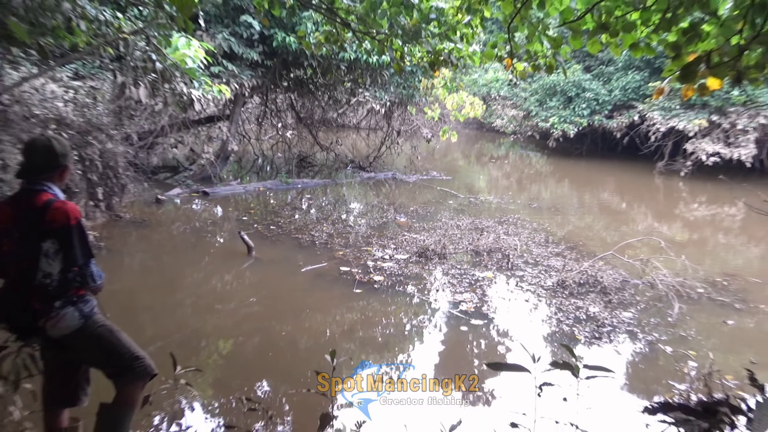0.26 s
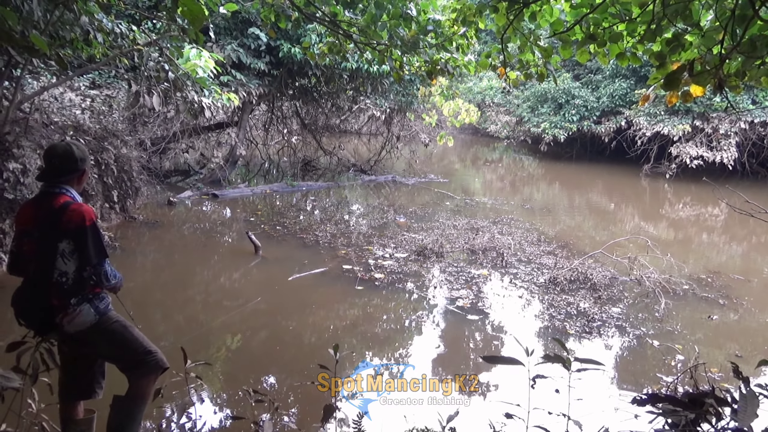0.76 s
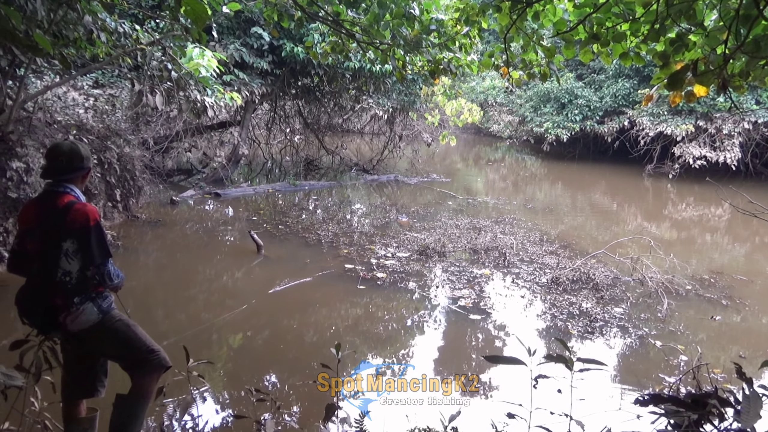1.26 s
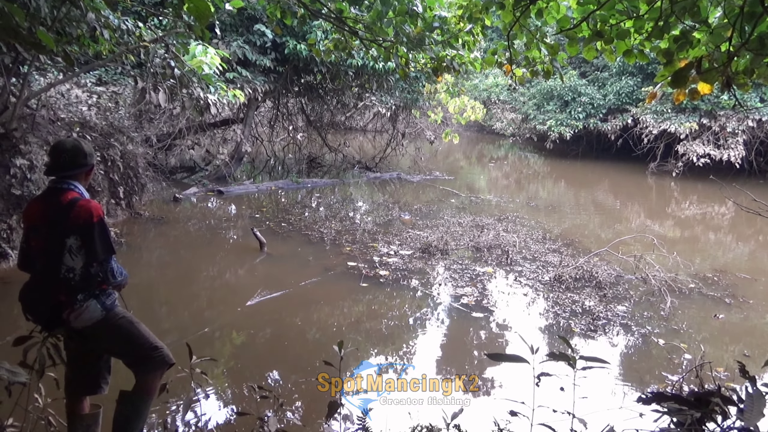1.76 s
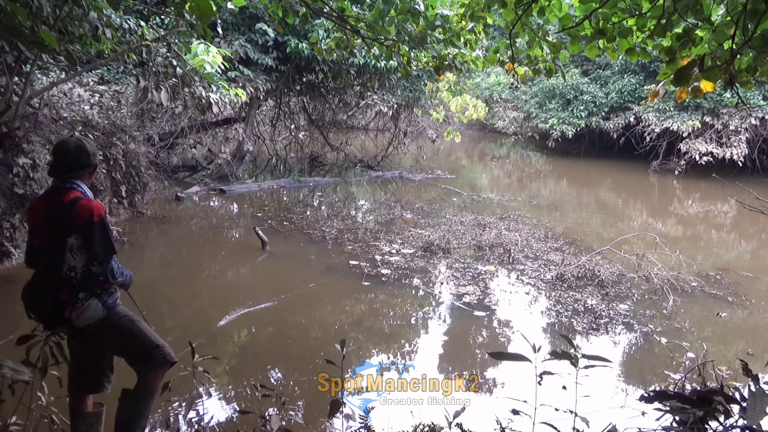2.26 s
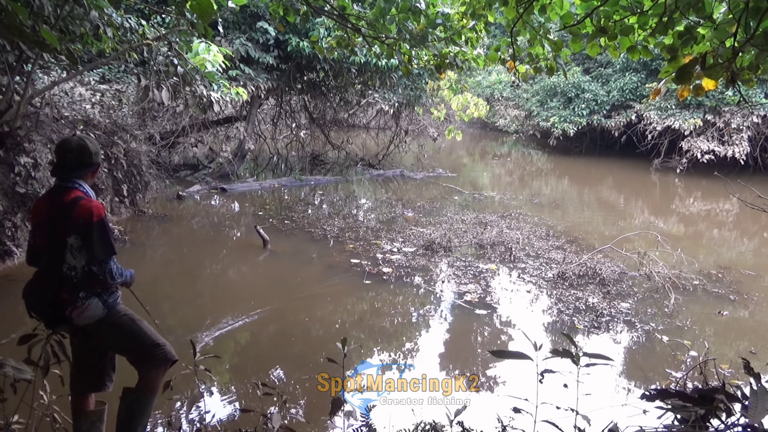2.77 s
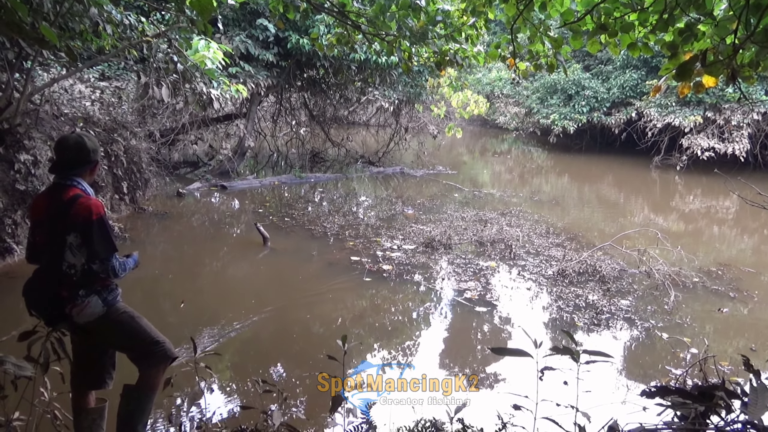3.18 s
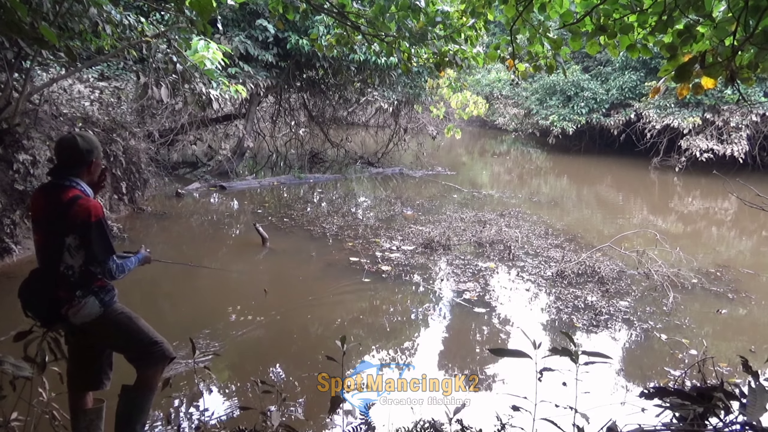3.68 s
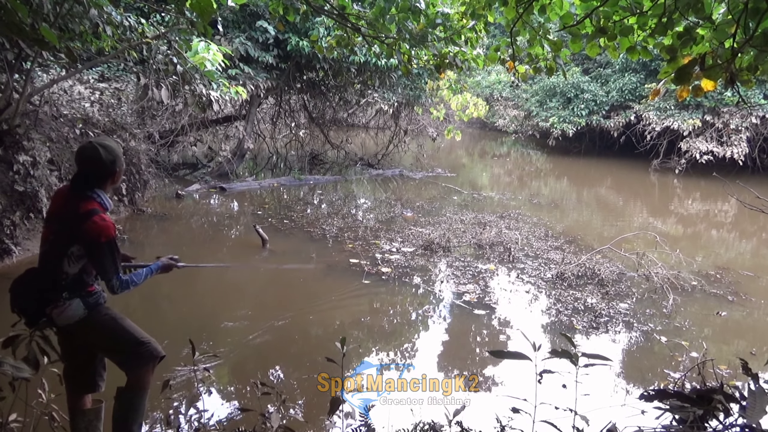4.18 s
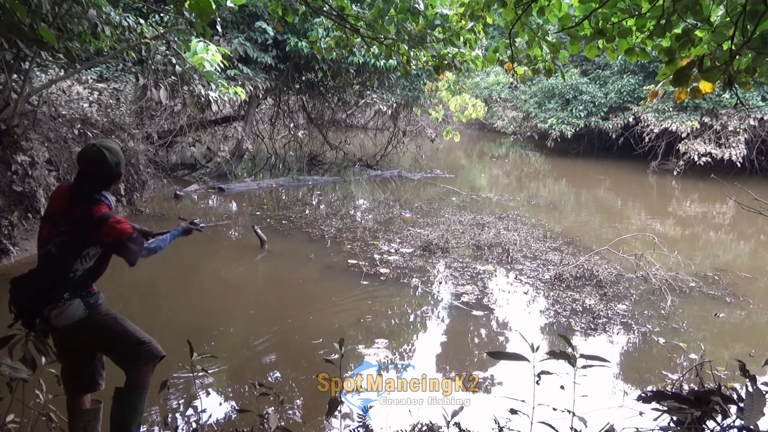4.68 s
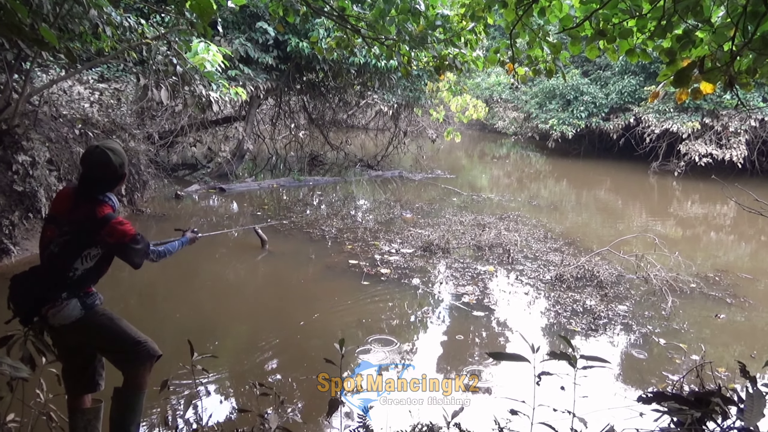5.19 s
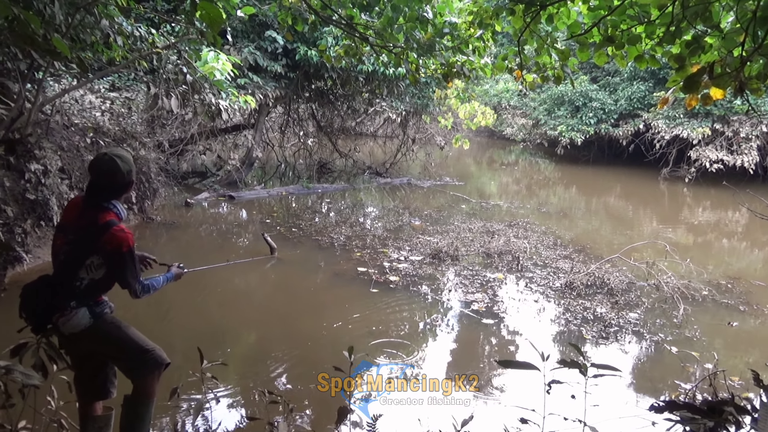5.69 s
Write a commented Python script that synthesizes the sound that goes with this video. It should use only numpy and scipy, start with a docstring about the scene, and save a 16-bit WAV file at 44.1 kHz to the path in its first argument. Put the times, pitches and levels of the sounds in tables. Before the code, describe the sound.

Cicadas sizzle steadily over a quiet muddy river while high insect chirps and trills repeat, water plips, and an angler's reel snaps and rod swishes in a cast.

```python
"""Cicadas sizzle without pause by a muddy forest river; one high singer chirps, another gives longer trills.
Cicadas and river are coloured noise; the singers are pulsed tones, smeared by echoes among the trees. Water
plips as ringing bubbles over a low throb that swells, then holds; a distant bird calls faintly near 1.6 kHz and
something ticks far off. An angler winds in, snaps the reel open and flicks the rod: bands of noise swish, the
line runs out as shaped noise, reel and tackle click and ring."""
import sys
import numpy as np
from scipy import signal
from scipy.fft import rfft, irfft
from scipy.io import wavfile

SR = 44100
rng = np.random.default_rng(int(sys.argv[2]) if len(sys.argv) > 2 else 0)


def master_out(mix):
    """Clip the mix to full scale and print it as 16-bit PCM to the path in sys.argv[1]."""
    frames = np.transpose(np.atleast_2d(mix))
    ceiling = np.clip(frames, -1, 1)
    pcm = np.round(ceiling * 32767).astype(np.int16)
    wavfile.write(sys.argv[1], SR, pcm)


N = 261954  # length of the scene [samples]
T = np.arange(N) / SR  # time [s]
BINS = np.fft.rfftfreq(N, 1 / SR)  # frequencies of the whole scene's spectrum [Hz]
EDGE_HZ = 15600  # nothing much is heard above this

# How fast echoes in the forest die away: (pitch [Hz], time to fall by 60 dB [s])
FOREST_T60 = [(200, 0.36), (2500, 0.31), (8000, 0.29), (14000, 0.067)]

# Colour of the river and forest air: (pitch [Hz], relative level [dB per Hz])
AIR_COLOUR = [(20, -19), (70, -7), (110, -2.5), (150, 2.5), (200, -2), (310, -7.5), (700, -10.5),
              (1300, -14), (2100, -15), (2600, -16), (3300, -18), (5000, -22), (11000, -22), (15500, -29.5)]
AIR_DB = -39.5
# How alike the air is in the left and right ear: (pitch [Hz], correlation [-1 to 1])
AIR_LIKENESS = [(60, 0.98), (170, 0.99), (350, 0.54), (700, 0.035), (1500, 0.07), (3000, 0.13),
                (6000, 0.76), (10000, 1), (11500, 1)]
# Tones of the low throb: (pitch [Hz], level before the swell [dB])
THROB_TONES = [(34.8, -45), (57.3, -58), (145.5, -54)]
# How the throb swells, then holds: (time [s], gain [dB])
THROB_SWELL = [(0, -7), (1.3, -4), (2.3, 0), (5.9, 0)]

# Colour of the cicada chorus: (pitch [Hz], relative level [dB per Hz])
CICADA_COLOUR = [(5400, -34.5), (6250, -21), (6550, -26.5), (7000, -16.5), (7900, -7), (8100, -13.5),
                 (8300, -4.5), (8680, -3.5), (8850, -1.1), (8970, -2), (9170, -7.1), (9450, -18.1),
                 (9850, -21.1), (11000, -52)]
# Loudness of the chorus: (time [s], level before gain_db [dB])
CICADA_LEVEL = [(0, -32), (2.8, -31.4), (4.0, -32), (4.7, -33), (4.85, -31.5), (5.0, -35.5), (5.94, -34)]

# One distant singer that never stops; its level is set before the ears are blended
FAR_DRONE_HZ, FAR_DRONE_DB, FAR_DRONE_SWAY_DB = 6835, -46.5, 1.5
# Calls of other singers deep in the forest:
# (start [s], length [s], pitch [Hz], level before the ears are blended [dB])
FAR_CALLS = [(0.62, 0.39, 6400, -46.5), (2.16, .22, 7300, -42), (2.615, .16, 6370, -43),
             (3.974, 0.12, 7340, -39), (4.89, 0.21, 6370, -45), (4.913, .14, 7200, -42),
             (5.494, 0.1, 6320, -45), (5.82, .16, 7250, -41)]

# Faint calls of a distant bird: (start [s], length [s], pitch [Hz], level before echoes [dB])
BIRD_CALLS = [(0.024, .38, 1580, -55.5), (3.179, 0.14, 1646, -52.5)]

# Resonances of a faint, even ticking far off, perhaps a frog:
# (pitch [Hz], level before softening [dB], time to fall by 60 dB [s])
TICK_MODES = [(2095, -45, .024), (2610, -41.5, 0.019), (2810, -41.5, 0.022)]
TICKS_PER_S = 25

# The clearest plips of water: (time [s], level [dB], starting pitch [Hz], rise [octaves per s])
PLIPS = [(.426, -32.5, 1386, 8), (.483, -30, 3480, 30), (.486, -28, 2480, 32), (0.879, -34, 1600, 98),
         (.929, -34.5, 858, 44), (1.05, -32, 2750, 5), (1.151, -31.5, 895, 3), (1.152, -32, 1454, 1),
         (1.48, -29, 1665, 82), (1.538, -32, 1063, 5), (1.542, -32, 1830, 0), (1.602, -32, 2110, 5),
         (1.643, -24, 1640, 60), (1.714, -30.5, 2420, 22), (1.803, -23, 2340, -5), (2.241, -27, 2160, 80),
         (2.342, -29, 640, 4.5), (2.343, -27.5, 990, 72), (2.626, -25, 1010, 5.5), (2.777, -25, 3530, 1.5)]
BUBBLE_CYCLES = 59  # a bubble falls by 60 dB in this many cycles, so large ones ring longer
# Water sloshing at the bank: (crest [s], rise [s], level [dB])
SLOSHES = [(2.35, 0.026, -45), (2.8, .18, -45.5)]
SLOSH_FALL_DB_PER_S = 90

# Second singer, alike trills a little under a second apart: (start [s])
TRILLS = [-.11, .74, 1.68, 2.54, 3.41, 4.31, 5.27]
TRILL_S, TRILL_PULSES_PER_S = .44, 42
TRILL_HZ, TRILL_DB = 7483, -24.5  # at the top of the arch, before the swing of each pulse
TRILL_SAG_HZ, TRILL_SAG_DB, TRILL_SKEW = 64.4, 6.5, 1.2  # both ends lie lower; the top comes late

# Chirps of the near singer: (strongest pulse [s], swell [s], level before gain_db [dB])
CHIRPS = [(.25, 0.074, -28.5), (.596, .064, -27.5), (.966, .046, -26.5), (1.319, 0.038, -15.5),
          (1.709, .044, -17.5), (2.074, 0.035, -19.2), (2.418, .04, -26.5), (2.807, 0.052, -18),
          (3.204, 0.083, -17), (3.532, 0.051, -24.5), (3.914, 0.079, -18.5), (4.243, 0.071, -28.5),
          (4.587, .077, -19.5), (4.86, 0.057, -27), (5.104, 0.045, -18.5), (5.427, .042, -20),
          (5.773, 0.066, -26.5)]
CHIRP_HZ, CHIRP_PULSES_PER_S = 7680, 40.4

# Swings of the rod, back and then forward:
# (fastest moment [s], speeding up [s], slowing down [s], top pitch [Hz], level [dB])
SWINGS = [(4.47, .18, 0.16, 3570, -50), (4.75, .125, .16, 6740, -38)]
SWING_SLOW_SHARE = .45  # pitch at rest as a share of the top pitch
SWING_LOUDNESS_POWER = 1.7  # loudness grows as this power of speed

# Line hisses as it is wound in
WIND_CREST_S, WIND_RISE_S, WIND_HOLD_S, WIND_FALL_DB_PER_S = 2.1, 0.042, 0.43, 120
WIND_HZ, WIND_DB = 3474, -46.5

# Line rattles off the spool in the cast
SPOOL_CREST_S, SPOOL_RISE_S, SPOOL_HOLD_S, SPOOL_FALL_DB_PER_S = 4.695, .034, .06, 99
SPOOL_DB = -33

# Knocks of reel and tackle:
# (time [s], level [dB], time to fall by 60 dB [s], brightness [dB per octave])
KNOCKS = [(4.1201, -5.5, 0.0056, 3.5), (4.1214, -12.5, 0.021, 1), (4.13, -21, 0.096, 3.5),
          (4.6744, -7.5, 0.0029, 1.5), (4.7184, -12, .005, 11), (5.595, -30, 0.22, 9.5),
          (5.669, -28, 0.019, -2), (5.674, -21, 0.021, -2.5), (5.679, -32, 0.11, 0),
          (5.783, -25, 0.034, -6.5)]
# What the reel rings with: (pitch [Hz], relative level [dB per Hz])
REEL_COLOUR = [(200, -5.5), (700, -13), (1000, -8.5), (1700, -6), (2250, -5), (2620, 9), (3100, -6.5),
               (3900, -3.5), (4600, -6), (5600, -6), (8000, -6), (11000, -9), (13000, -37), (16000, -24)]
REEL_LEFT_DB = 1.1  # the angler stands to the left: left ear up, right ear down by this much
# The wire of the reel rings on after the first snap:
# (pitch [Hz], level [dB], time to fall by 60 dB [s])
WIRE_MODES = [(2640, -21.5, .12)]
BAIL_S = 5.596  # the bail of the reel clunks shut
# Tones of the bail: (pitch [Hz], level [dB], time to fall by 60 dB [s])
BAIL_MODES = [(797, -27.5, 0.035), (1080, -32, .03), (1410, -24.5, 0.033)]

# Line slapping the rod rings: (time [s], level [dB], time to fall by 60 dB [s])
SLAPS = [(4.7396, -6.5, 0.015), (4.7474, -2.5, 0.015), (4.755, -13, 0.013)]
# What the rod rings sound like when slapped: (pitch [Hz], relative level [dB per Hz])
ROD_RING_COLOUR = [(2000, -44), (5000, -17), (7000, -4.5), (8500, -3.5), (9600, 6.5), (11300, -4),
                   (12500, -8), (16000, -24)]
# Small metal tinkles of the tackle: (time [s], gain on the tones below [dB])
TINKLES = [(4.886, -37), (5.046, -39), (5.248, -36)]
# Tones of a tinkle: (pitch [Hz], relative level [dB], time to fall by 60 dB [s])
TINKLE_MODES = [(10750, -1, 0.08), (11950, -2.5, 0.08)]


def amp(db):
    """Turns decibels into a gain."""
    return 10 ** (np.asarray(db) / 20)


def unit(x):
    """Scales a sound to an average strength (rms) of 1."""
    return x / np.sqrt(np.mean(abs(x) ** 2) + 1e-20)


def at_hz(points, hz):
    """Reads a table between its points, on a log-frequency axis."""
    f, value = np.transpose(points)
    return np.interp(np.log(hz + 1), np.log(f + 1), value)


def curves(rows, t):
    """Reads each column of a table at the times t."""
    s, *columns = np.transpose(rows)
    return [np.interp(t, s, column) for column in columns]


def add(mix, s, sound):
    """Mixes a sound in at time s, or at the very start if s is negative."""
    part = mix[max(round(s * SR), 0):][:len(sound)]
    part += sound[:len(part)]


def wander(hz):
    """Random drift of rms 1, with speeds up to about hz."""
    spectrum = rfft(rng.standard_normal(N))
    return unit(irfft(spectrum * np.exp(-(BINS / hz) ** 2), N))


def fuzzy_tone(hz, width_hz):
    """A band of noise around a pitch that may move."""
    phase = 2 * np.pi * np.cumsum(hz * np.ones(N)) / SR
    return unit(wander(width_hz) * np.cos(phase) + wander(width_hz) * np.sin(phase))


def stereo_noise(spectrum, same):
    """Coloured noise with a given likeness between the ears."""
    mid, side = rfft(rng.standard_normal((2, N))) * amp(at_hz(spectrum, BINS))
    same = np.clip(same, -1, 1)
    mid = mid * np.sqrt(1 + same)
    side = side * np.sqrt(1 - same)
    return unit(irfft(np.array([mid + side, mid - side]), N))


def forest(x, wet_db, spread):
    """Direct sound plus scattered echoes from trunks and leaves; each pitch dies away at its own rate."""
    size = (2, SR // 2)
    taps = rng.standard_normal(size) * (rng.random(size) < 2500 / SR)  # about 2500 echoes a second
    taps[:, :SR // 200] = 0  # the first 5 ms hold no echo
    hz, t, z = signal.stft(taps, SR, nperseg=256)
    fade = amp(-60 * t / at_hz(FOREST_T60, hz)[:, None])
    mid, side = signal.istft(z * fade, SR, nperseg=256)[1]
    tails = np.array([mid + spread * side, mid - spread * side])
    echoes = signal.fftconvolve(x[None], tails, axes=1)[:, :N]
    return x + amp(wet_db) * np.std(x) * unit(echoes)


def pulses(turns, sharpness, floor):
    """One rounded pulse on each whole turn, over a floor."""
    return floor + (1 - floor) * abs(np.cos(np.pi * turns)) ** sharpness


def envelope(crest_s, rise_s, hold_s, fall_db_per_s):
    """Swells by 20 dB over rise_s up to the crest, holds, and dies away."""
    rise_db = -20 * (np.minimum(T - crest_s, 0) / rise_s) ** 2
    fall_db = -fall_db_per_s * np.maximum(T - crest_s - hold_s, 0)
    return amp(rise_db + fall_db)


def ringing(modes):
    """A few pure tones, struck together, die away."""
    t = np.arange(SR // 8) / SR
    return sum(amp(db - 60 * t / t60) * np.sin(2 * np.pi * hz * t) for hz, db, t60 in modes)


def strike(spectrum, t60, tilt_db, attack_s):
    """A burst of densely packed resonances that dies away, as when something hard is knocked."""
    t, hz = np.arange(8192) / SR, np.fft.rfftfreq(8192, 1 / SR)
    tilt = tilt_db * np.log2(np.maximum(hz, 300) / 3000)  # pivots at 3000 Hz
    colour = amp(at_hz(spectrum, hz) + tilt)
    body = irfft(colour * np.exp(2j * np.pi * rng.random(len(hz))))
    fade = amp(-60 * t / t60) * (1 - np.exp(-t / attack_s))
    return unit(body * fade) * np.sqrt(np.mean(fade ** 2))


def air():
    """The soft wash of river and forest is coloured noise; wavering low tones make a throb that swells."""
    throb = np.zeros(N)
    for hz, db in THROB_TONES:
        wavering_hz = hz * (1 + 0.0054 * wander(2.3))
        throb += amp(db) * unit(np.sin(2 * np.pi * np.cumsum(wavering_hz) / SR))
    swell_db, = curves(THROB_SWELL, T)
    wash = stereo_noise(AIR_COLOUR, at_hz(AIR_LIKENESS, BINS)) * amp(AIR_DB + 0.37 * wander(17))
    return wash + throb * amp(swell_db)


def cicadas(buzz_hz=146, buzz_depth=0.11, flutter_db=0.35, gain_db=0.9, echo_db=-9):
    """Many drumming cicadas merge to a sizzle; the nearest stamps its buzz on it, and the trees echo it."""
    turns = np.cumsum(buzz_hz + 4.35 * wander(3.24)) / SR
    buzz = 1 + buzz_depth * np.cos(2 * np.pi * turns) + 0.035 * np.cos(4 * np.pi * turns)
    sizzle = stereo_noise(CICADA_COLOUR, 0.87) * buzz
    mid = sizzle.mean(0)
    echoed = sizzle - mid + forest(mid, echo_db, spread=0.99)  # only the part shared by both ears echoes
    level_db, = curves(CICADA_LEVEL, T)
    return unit(echoed) * amp(level_db + gain_db + flutter_db * wander(25))


def far_song(hz, pulses_per_s):
    """One distant singer's pulsed tone, blurred separately in each ear; complex, so its pitch can be moved."""
    blur = []
    for _ in range(2):
        slow = wander(50) + 1j * wander(50)
        fast = wander(170) + 1j * wander(170)
        blur.append(unit(slow + .7 * fast))
    beat = pulses(pulses_per_s * T + rng.random(), 2, .6)
    return unit(np.array(blur) * beat) * np.exp(2j * np.pi * hz * T)


def far_singers(pulses_per_s=41, bleed=0.2):
    """Distant songs, smeared by the trees into thin fuzzy lines: a drone and short calls."""
    drone = far_song(FAR_DRONE_HZ, pulses_per_s)
    out = amp(FAR_DRONE_DB + FAR_DRONE_SWAY_DB * wander(1.1)) * unit(drone.real)
    for start, length, hz, db in FAR_CALLS:
        now = (T > start) & (T < start + length)
        # each call borrows another stretch of the drone and moves it to its own pitch
        borrowed = np.roll(drone, rng.integers(N), axis=1)[:, now]
        tone = (borrowed * np.exp(2j * np.pi * (hz - FAR_DRONE_HZ) * T[now])).real
        out[:, now] += amp(db) * unit(tone) * signal.windows.tukey(now.sum(), .5)
    return (1 - bleed) * out + bleed * out[::-1]  # each ear gets a little of the other


def far_bird(width_hz=150, echo_db=2):
    """Faint calls of a distant bird near 1.6 kHz: a narrow band of noise, half lost in its echoes."""
    out = np.zeros(N)
    for start, length, hz, db in BIRD_CALLS:
        size = int(length * SR)
        add(out, start, amp(db) * fuzzy_tone(hz, width_hz)[:size] * signal.windows.tukey(size, .4))
    return forest(out, echo_db, spread=0.97)


def far_ticking(weak_db=-3, scatter_db=1.5, echo_db=-3, attack_s=0.0019):
    """Strong and weak ringing ticks take turns, their edges softened by distance."""
    out, tick = np.zeros(N), ringing(TICK_MODES)
    tick = tick * (1 - np.exp(-T[:len(tick)] / attack_s))
    for k, chance in enumerate(rng.standard_normal(int(TICKS_PER_S * N / SR))):
        add(out, k / TICKS_PER_S, amp(weak_db * (k % 2) + scatter_db * chance) * tick)
    return forest(out * (1 + .5 * wander(225)), echo_db, spread=0.58)


def water(small_per_s=14, small_db=-42, rough=0.21):
    """Each drop makes a short splash and a ringing bubble whose pitch may glide; fuzzy noise sloshes."""
    out, t = np.zeros(N), np.arange(SR // 10) / SR
    small = []  # tiny plips at random moments fill the gaps
    for s, size, pitch, rise in rng.random((int(small_per_s * N / SR), 4)):
        small.append((s * N / SR, small_db + 6 * (size - .5), 900 * 3.5 ** pitch, 30 * rise))
    for s, db, hz, rise in PLIPS + small:
        glide = hz * 2 ** np.minimum(rise * t, .8)  # rises by 0.8 octave at most
        fade = amp(db - 60 * t * hz / BUBBLE_CYCLES) * (1 - np.exp(-t / 0.00091))
        add(out, s, fade * np.sin(2 * np.pi * np.cumsum(glide) / SR))
        splash_colour = [(hz / 3, -30), (hz, 0), (hz * 1.3, -5), (hz * 2.5, -30)]
        add(out, s, amp(db - 12) * strike(splash_colour, .03, 0, .001))
    laps = sum(amp(db) * envelope(s, rise, 0, SLOSH_FALL_DB_PER_S) for s, rise, db in SLOSHES)
    slosh = laps * amp(3 * wander(50)) * fuzzy_tone(820, 310)
    return forest(out * (1 + rough * wander(440)) + slosh, wet_db=-8, spread=.9)


def trill_singer(rough=0.37):
    """Longer trills that arch in pitch and loudness; the pitch swings with each pulse."""
    out = np.zeros(N)
    waver_hz = 32 * wander(110)
    for start in TRILLS:
        now = (T > start) & (T < start + TRILL_S)
        since = T[now] - start
        sag = 1 - np.sin(np.pi * (since / TRILL_S) ** TRILL_SKEW)  # 0 at the top of the arch, 1 at its ends
        turns = TRILL_PULSES_PER_S * since + .5
        swing_hz = 62 * np.cos(2 * np.pi * turns) - 25
        hz = TRILL_HZ - TRILL_SAG_HZ * sag + waver_hz[now] + swing_hz
        tone = np.sin(2 * np.pi * np.cumsum(hz) / SR)
        level = amp(TRILL_DB - TRILL_SAG_DB * sag) * pulses(turns, 2.2, .25)
        out[now] += level * tone * signal.windows.tukey(len(sag), .04)
    heard = forest(out * (1 + rough * wander(160)), wet_db=-2.5, spread=1)
    return heard * amp([[-.4], [.4]])  # slightly to the right


def near_singer(onset_db=-15, hold_s=0.011, fall_db_per_s=230, tail_db=-13, tail_fall_db_per_s=120, gain_db=2):
    """Each chirp is a pure tone in pulses that swell quickly and die away."""
    out = np.zeros(N)
    for peak, swell_s, db in CHIRPS:
        t = np.arange(-swell_s, .25, 1 / SR)  # zero at the strongest pulse
        rise_db = onset_db * (np.minimum(t, 0) / swell_s) ** 2
        swell = amp(rise_db - fall_db_per_s * np.maximum(t - hold_s, 0))
        tail = amp(tail_db - tail_fall_db_per_s * abs(t - hold_s))
        turns = CHIRP_PULSES_PER_S * t
        hz = CHIRP_HZ + rng.normal(0, 12.0) + 34 * np.cos(2 * np.pi * turns)  # sags between pulses
        level = amp(db + gain_db) * np.maximum(swell, tail) * pulses(turns, 2.4, .22)
        tone = np.sin(2 * np.pi * np.cumsum(hz) / SR)
        add(out, peak - swell_s, level * tone * signal.windows.tukey(len(t), .06))
    heard = forest(out * (1 + .16 * wander(220)), wet_db=-6.5, spread=.7)
    return heard * amp([[.4], [-.4]])  # slightly to the left


def winding(width_hz=650, ragged_db=3, uneven_db=2):
    """Line rasps through the rings as the reel is turned: a band of noise of uneven loudness."""
    rasp = unit(fuzzy_tone(WIND_HZ, width_hz) + .5 * fuzzy_tone(WIND_HZ, 2200))
    level = amp(WIND_DB + ragged_db * wander(140) + uneven_db * wander(27))
    return level * envelope(WIND_CREST_S, WIND_RISE_S, WIND_HOLD_S, WIND_FALL_DB_PER_S) * rasp


def swishes(width_hz=850, ragged_db=3):
    """The rod sheds swirls of air: their pitch and loudness follow its speed."""
    out = np.zeros(N)
    for s, rise, fall, top_hz, db in SWINGS:
        stroke = np.interp(T, [s - rise, s, s + fall], [-1, 0, 1])
        speed = np.cos(np.pi / 2 * stroke).clip(0, 1)
        hz = top_hz * (SWING_SLOW_SHARE + (1 - SWING_SLOW_SHARE) * speed ** 2)
        rush = unit(fuzzy_tone(hz, width_hz) + .5 * fuzzy_tone(hz, 2200))
        out += amp(db) * speed ** SWING_LOUDNESS_POWER * rush
    return out * amp(ragged_db * wander(140))


def line_running_out():
    """Line rattles off the spool: coloured noise, the same in both ears, that swells and dies away."""
    colour = [(300, -1), (800, -2), (1500, -4.5), (2200, 4.5),
              (3200, -5.5), (5500, -1), (10500, -0.5), (15000, -19)]  # (pitch [Hz], level [dB per Hz])
    swell = envelope(SPOOL_CREST_S, SPOOL_RISE_S, SPOOL_HOLD_S, SPOOL_FALL_DB_PER_S)
    return amp(SPOOL_DB + 2.2 * wander(150)) * swell * stereo_noise(colour, 1.0)


def reel_knocks():
    """Hard knocks set the reel ringing; its wire and bail add a few clear tones."""
    knocks = np.zeros(N)
    for s, db, t60, tilt_db in KNOCKS:
        add(knocks, s, amp(db) * strike(REEL_COLOUR, t60, tilt_db, .0001))
    add(knocks, KNOCKS[0][0], ringing(WIRE_MODES))
    add(knocks, BAIL_S, ringing(BAIL_MODES))
    return knocks


def line_slaps():
    """Line slaps the rod rings in short bright bursts; small metal parts tinkle as pure tones."""
    slaps = np.zeros(N)
    for s, db, t60 in SLAPS:
        add(slaps, s, amp(db) * strike(ROD_RING_COLOUR, t60, 0, 0.00047))
    for s, db in TINKLES:
        add(slaps, s, amp(db) * ringing(TINKLE_MODES))
    return slaps


def angler():
    """Reel, rod and line together; all but the line running out echo in the forest."""
    reel = forest(reel_knocks(), wet_db=-9, spread=.5) * amp([[REEL_LEFT_DB], [-REEL_LEFT_DB]])
    rod = forest(line_slaps() + swishes() + winding(), wet_db=-11.0, spread=.6)
    return reel + rod + line_running_out()


def scene():
    """Everything heard from the bank, from the background to the angler."""
    background = air() + cicadas() + far_singers() + far_bird() + far_ticking()
    return background + water() + trill_singer() + near_singer() + angler()


def record(dry):
    """Clips at full scale, then cuts away the highest treble."""
    low_pass = signal.firwin(511, EDGE_HZ, window=("kaiser", 9), fs=SR)
    return signal.oaconvolve(np.clip(dry, -1, 1), low_pass[None], "same")


dry = scene()
out = record(dry)
master_out(out)
```